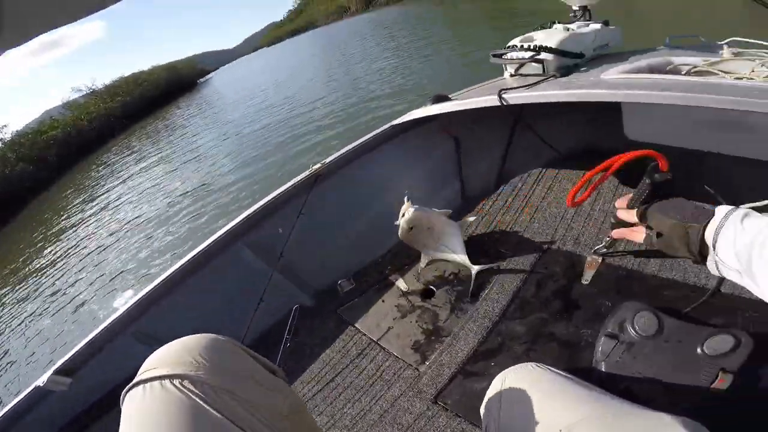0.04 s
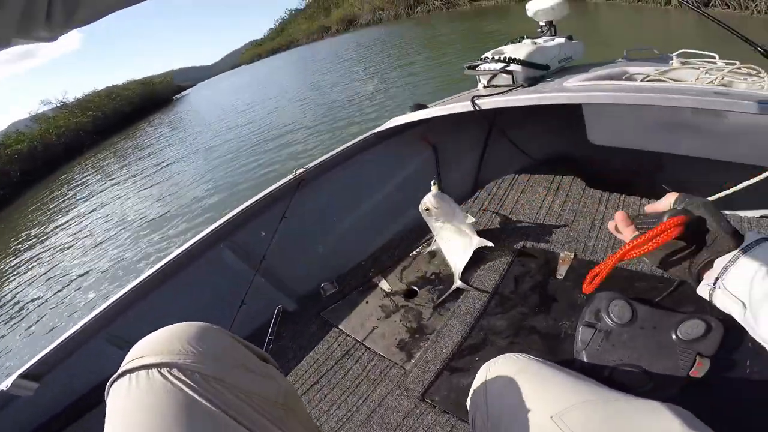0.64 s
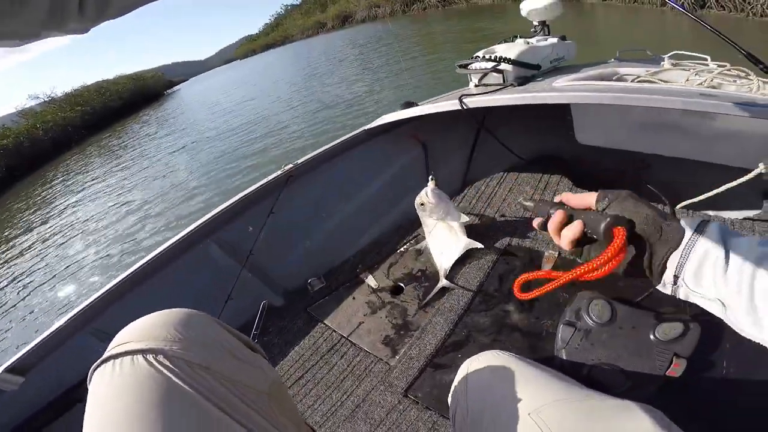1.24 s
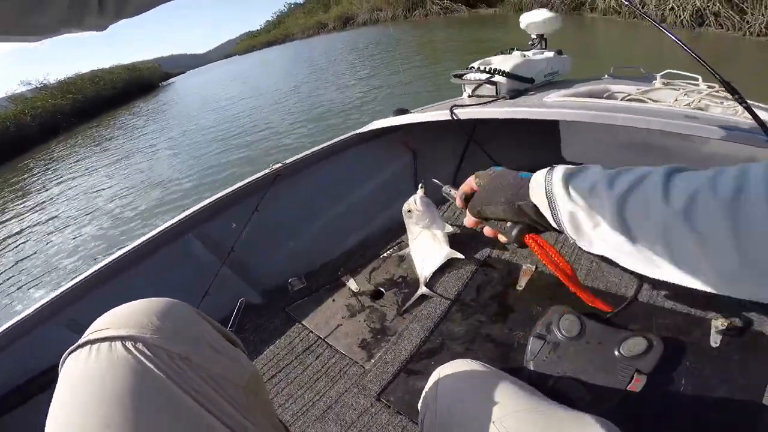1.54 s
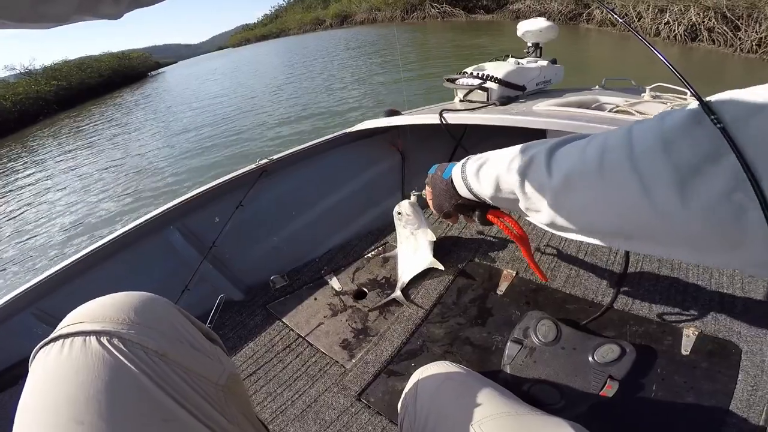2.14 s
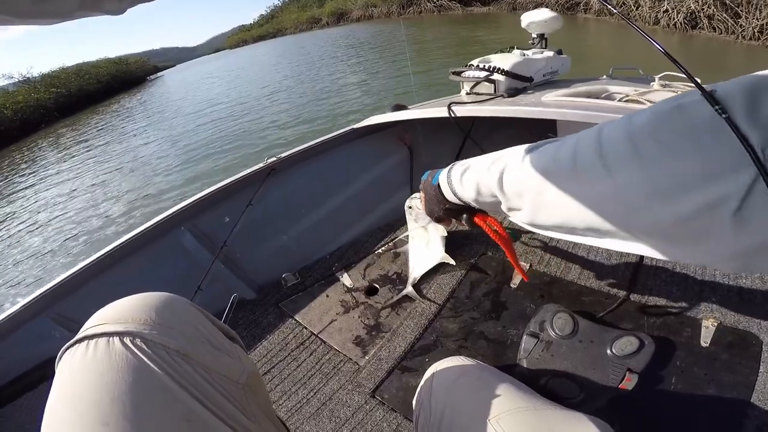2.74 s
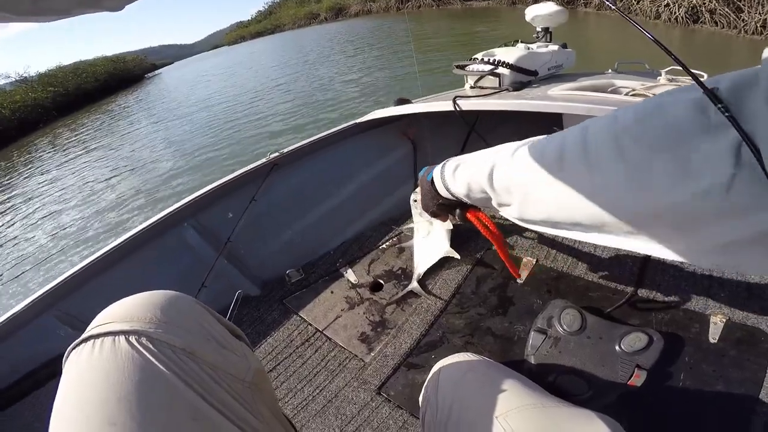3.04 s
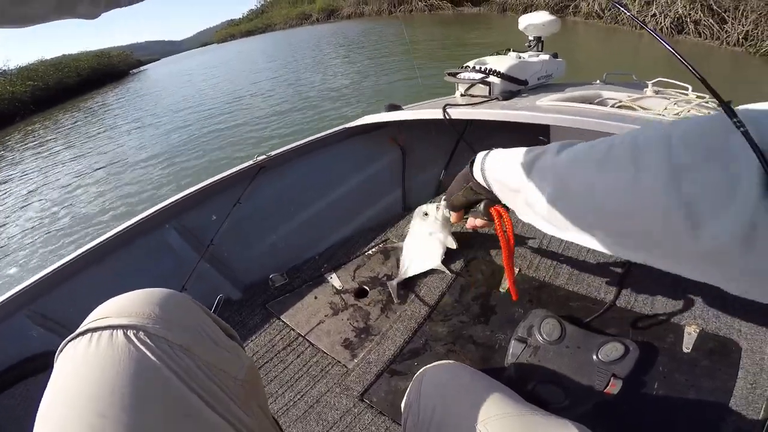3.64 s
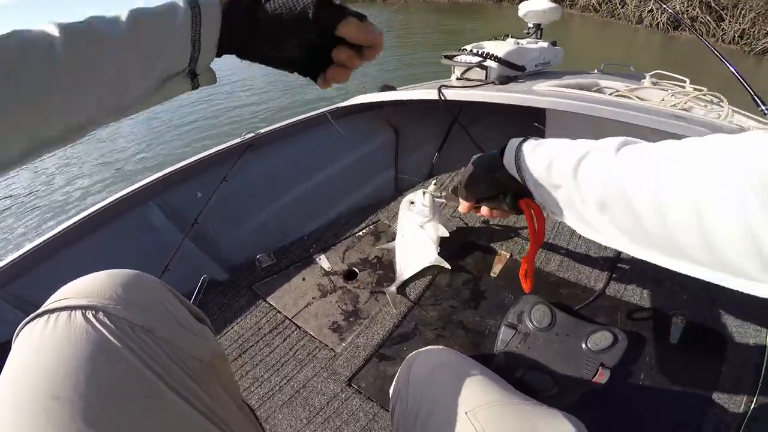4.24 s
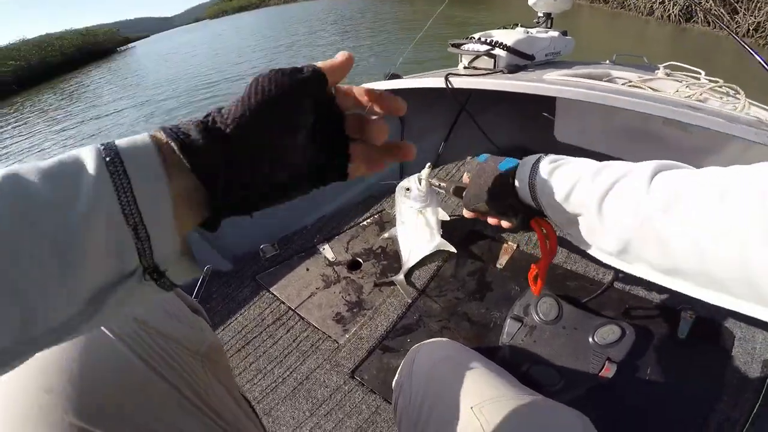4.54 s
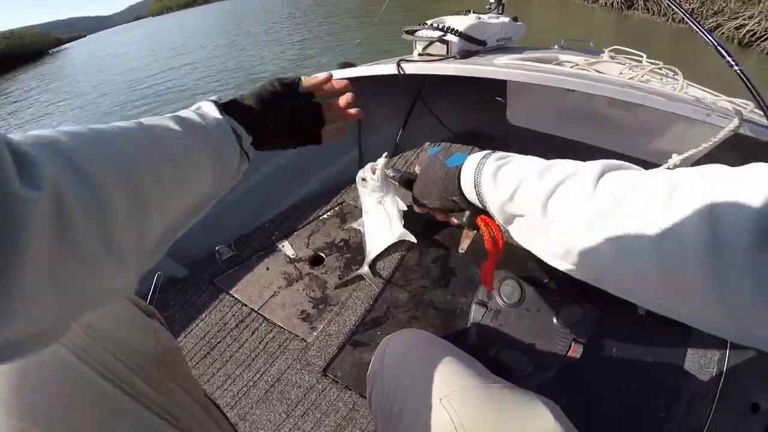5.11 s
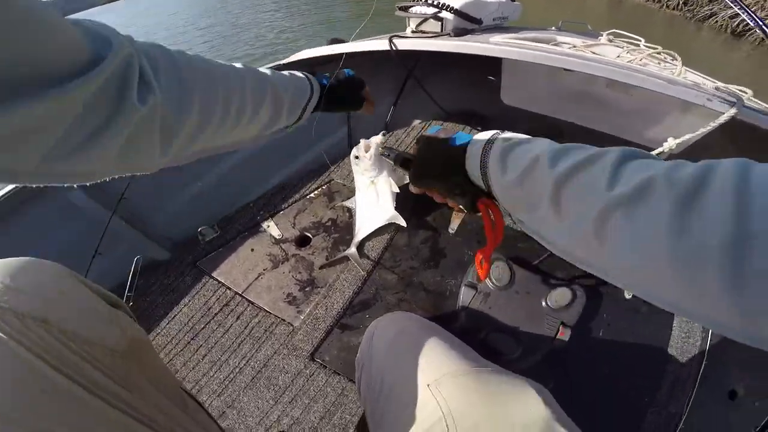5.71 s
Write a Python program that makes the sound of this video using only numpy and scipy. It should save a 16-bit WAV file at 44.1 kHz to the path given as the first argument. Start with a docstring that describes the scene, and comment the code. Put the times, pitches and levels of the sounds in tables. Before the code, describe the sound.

Steel pliers click on a hook, then a fish slaps the boat's carpeted floor in short fits, with dull thumps and soft water glugs.

```python
"""On the carpeted deck of an aluminium boat on a river, a small hooked fish flaps in rattling fits,
each a run of wet slaps that ring the deck panel. Steel pliers click, scrape and squeak on the hook.
Small waves trap air that glugs under the hull, over a faint wash of water and a rustle of sleeves.
The angler's movements thump and rumble through the deck into a body-worn microphone."""
import sys
import numpy as np
from scipy import signal
from scipy.fft import rfft, irfft
from scipy.io import wavfile
from scipy.ndimage import uniform_filter1d

SR = 44100
rng = np.random.default_rng(int(sys.argv[2]) if len(sys.argv) > 2 else 0)


def log_audio(samples):
    """Write samples as a 16-bit WAV file to the path given in sys.argv[1]."""
    # one column per channel
    frames = np.atleast_2d(samples).T
    # limit to full scale, then quantise
    limited = np.clip(frames, -1, 1)
    pcm = np.round(limited * 32767).astype(np.int16)
    wavfile.write(sys.argv[1], SR, pcm)


N = 254438
TIME = np.arange(N) / SR


def from_db(db):
    """Decibels to gain."""
    return 10 ** (np.asarray(db) / 20)


def rms_one(x):
    """Scale to unit rms."""
    return x / np.sqrt(np.mean(x ** 2) + 1e-20)


def in_time(rows):
    """Turn timed breakpoints into one fader curve per column."""
    s, *columns = np.transpose(rows)
    return [np.interp(TIME, s, column) for column in columns]


def add(out, s, sound):
    """Mix a short sound in at s seconds."""
    start = int(np.clip(round(s * SR), 0, N - 1))
    out[start:start + len(sound)] += sound[:N - start]


def drift(per_s):
    """A slow random wander between -2 and 2."""
    knots = np.arange(0, N / SR + 1, 1 / per_s)
    return np.interp(TIME, knots, rng.uniform(-2, 2, len(knots)))


def colour(x, spectrum):
    """Minimum-phase EQ with unit power gain, rolling off past the ends of the curve."""
    hz, db = np.transpose(spectrum)
    size = 2 ** int(np.ceil(np.log2(8 * SR / hz[0])))
    log_hz = np.log(np.maximum(np.fft.rfftfreq(size, 1 / SR), 1))
    outside = np.abs(log_hz - np.clip(log_hz, np.log(hz[0]), np.log(hz[-1])))
    gain = rms_one(from_db(np.interp(log_hz, np.log(hz), db) - 25 * outside))
    cepstrum = irfft(np.log(gain + 1e-9))[:size // 2]
    cepstrum[1:] *= 2
    impulse = irfft(np.exp(rfft(cepstrum, size)))
    return signal.oaconvolve(x, impulse)[:N]


def noise(spectrum):
    """Steady coloured noise at unit rms."""
    return rms_one(colour(rng.standard_normal(N), spectrum))


def even(x, window_s):
    """Ride out the slow swells of a noise."""
    power = uniform_filter1d(np.abs(signal.hilbert(x)) ** 2, int(window_s * SR))
    return rms_one(x / np.sqrt(np.maximum(power, 1e-6)))


def resonance(x, hz, width_hz):
    """Band-pass with unity gain at its peak."""
    return signal.lfilter(*signal.iirpeak(hz, hz / width_hz, fs=SR), x + 1e-18)


def band(x, hz, width_hz):
    """Two passes through one resonance, at unit rms."""
    return rms_one(resonance(resonance(x, hz, width_hz), hz, width_hz))


def grains(size, spread_db):
    """Gritty noise: every sample has its own random level."""
    return rng.standard_normal(size) * from_db(rng.normal(0, spread_db, size))


def swish(length_s, hz, width_hz):
    """A band of dense grains that swells quickly and tails off."""
    size = int(length_s * SR)
    swell = np.sin(np.pi * np.linspace(0, 1, size) ** .59)
    return swell * band(grains(size, spread_db=7.3), hz, width_hz)


def ring(modes, tilt_db_per_octave, detune):
    """One blow on a set of modes; strengths and pitches vary with the point of contact."""
    hz, db, t60 = np.transpose(modes)[:, :, None]
    t = TIME[:SR // 12]
    strength_db = db + tilt_db_per_octave * np.log2(hz / np.median(hz)) + rng.normal(0, 4, hz.shape)
    pitch = hz * (1 + detune * rng.standard_normal(hz.shape))
    return np.sum(from_db(strength_db - 60 * t / t60) * np.sin(2 * np.pi * pitch * t), axis=0)


def cracks(times, levels_db, rise_s, t60, tail_db, tail_t60):
    """Each contact is a quick noise burst with a weaker tail of scatter from the hull."""
    out, t = np.zeros(N), TIME[:SR // 8]
    envelope = from_db(-60 * t / t60) + from_db(tail_db - 60 * t / tail_t60)
    envelope *= 1 - np.exp(-t / rise_s)
    for s, db in zip(times, levels_db):
        add(out, s, from_db(db) * envelope * rng.standard_normal(len(t)))
    return out


# Fader moves for water and cloth. Each row: time in seconds, wash and rustle in dB before shaping.
BED_FADERS = [(0.0, -56, -63), (0.48, -64, -68), (0.98, -68, -70), (1.54, -63, -67), (1.98, -68, -69),
              (2.45, -65, -70), (2.75, -67, -70), (3.33, -62, -65), (3.78, -62, -68), (3.97, -56, -64),
              (4.15, -64, -69), (4.92, -67, -69), (5.4, -63, -67), (5.75, -63, -69)]
# The tone of the river, the sleeves and the hiss. Each row: frequency in Hz, relative level in dB.
WASH_EQ = [(120, -1), (300, 2), (450, -1), (650, -4.5), (1000, -10.5), (1800, -15.5), (3000, -29)]
RUSTLE_EQ = [(880, -32), (1500, -3), (2490, -4.5), (2700, -3.5), (3540, -3), (4940, -8), (8050, -10),
             (15500, -21)]
HISS_EQ = [(1000, -4.5), (2000, -6.5), (3000, -8), (4200, -7.5), (5200, -9), (6000, -5.5), (7000, -14),
           (10000, -15), (14500, -18.5), (15500, -24)]

def background():
    """The bed: faint river wash, grainy sleeve rustle, steady hiss and a thin, wavering whine."""
    wash_db, rustle_db = in_time(BED_FADERS)
    rustle_db += .7 * (rustle_db - np.median(rustle_db))   # cloth falls quiet between movements
    rustle = from_db(rustle_db - 2.2) * rms_one(colour(grains(N, spread_db=6.6), RUSTLE_EQ))
    whine = band(rng.standard_normal(N), hz=6000, width_hz=600)
    hiss = from_db(-69) * noise(HISS_EQ)
    whine *= from_db(-81 + 3 * drift(per_s=4))
    wash = from_db(wash_db + 1.6) * noise(WASH_EQ)
    return wash + rustle + hiss + whine


# How much the angler moves. Each row: time in seconds, relative sway level in dB.
BODY_MOVEMENT = [(0.0, -54), (0.88, -64), (1.73, -56), (2.07, -38), (2.47, -38), (2.99, -29), (3.25, -32),
                 (3.46, -39), (3.78, -38), (3.96, -29), (4.28, -36), (4.85, -39), (5.25, -32), (5.75, -34)]
# Tugs of the arm. Each row: start and length in seconds, sway level in dB, rubbing level in dB.
ARM_TUGS = [(1.25, .22, -52, -68), (1.88, .2, -38, -72), (2.14, .2, -32, -54), (2.52, .11, -20, -52),
            (2.76, .12, -24, -50), (2.91, .16, -27, -34.5), (3.77, .15, -29, -33), (3.89, .15, -24, -28),
            (4.07, .1, -19, -42), (5.01, .1, -30, -52), (5.16, .2, -26, -56), (5.48, .12, -25, -59)]
# The sub-bass sway and the muffled rubbing. Each row: frequency in Hz, relative level in dB.
SWAY_EQ = [(15, -4.5), (24, -0.5), (35, 0), (48, -3.5), (62, -11), (90, -24)]
RUBBING_EQ = [(40, -20.5), (65, 1.5), (100, -1), (150, -10), (220, -22.5), (400, -43.5)]

def handling():
    """The microphone sways in jolts with the body and clothing drags over it; each tug swells both."""
    movement_db, = in_time(BODY_MOVEMENT)
    swing_db = movement_db - movement_db.mean() + 2 * drift(per_s=11)
    sway = from_db(movement_db.mean() + 1.5 + swing_db)
    rubbing = from_db(-54.5 + .48 * swing_db)   # follows about half of the sway's swing
    for s, length, sway_db, rubbing_db in ARM_TUGS:
        swell = np.sin(np.linspace(0, np.pi, int(length * SR)))
        add(sway, s, from_db(sway_db) * swell)
        add(rubbing, s, from_db(rubbing_db) * swell)
    return sway * even(noise(SWAY_EQ), window_s=.091) + rubbing * even(noise(RUBBING_EQ), window_s=.052)


# Tool, fish and sleeve sliding. Each row: start and length in seconds, level in dB,
# centre and width in Hz.
SOFT_SCRAPES = [(0.019, 0.14, -58.5, 2800, 3200), (0.275, 0.035, -60, 2880, 900),
                (.583, 0.027, -61, 2400, 3500), (.63, .085, -65, 3500, 5000),
                (1.821, 0.088, -61.5, 1480, 3000), (2.895, 0.075, -52, 4550, 2000),
                (2.895, 0.057, -53, 1220, 420), (3.137, 0.059, -58, 4500, 5000),
                (3.487, 0.066, -49.5, 2050, 1900), (3.802, 0.054, -54, 2600, 3000),
                (3.84, 0.041, -46.5, 1060, 170), (3.973, 0.089, -55, 2200, 900),
                (3.987, 0.1, -55, 3800, 2600), (4.391, 0.07, -54.5, 3670, 3500),
                (5.3, .27, -65, 1100, 1100)]
# The jaws sliding along the hook. Each row: start and length in seconds, level in dB.
JAW_SLIDES = [(1.48, .085, -58), (1.559, .062, -47)]
# Resonances of the sliding jaws. Each row: centre and width in Hz, gain in dB.
JAW_PEAKS = [(2800, 1400, -4), (4720, 600, -.5), (7850, 7000, -2.5)]

def scrapes():
    """Friction: soft things slide with one resonance, the steel jaws with three."""
    out = np.zeros(N)
    for s, length, db, hz, width in SOFT_SCRAPES:
        add(out, s, from_db(db) * swish(length, hz, width))
    for s, length, db in JAW_SLIDES:
        for hz, width, peak_db in JAW_PEAKS:
            add(out, s, from_db(db + peak_db) * swish(length, hz, width))
    return out


# Air pockets under the hull. Each row: start in seconds, level in dB, starting pitch in Hz,
# seconds for the main note to fall 60 dB.
AIR_POCKETS = [(.145, -46, 339, .27), (.228, -50, 912, .16), (.655, -37, 385.4, .22),
               (.664, -48.5, 564, .08), (1.07, -42, 432.6, .18), (1.79, -55.5, 444, .2),
               (2.384, -43, 431, .15), (2.411, -37, 345, .21), (2.417, -44, 775, .16),
               (3.469, -33, 394, .08), (3.50, -36.5, 420, .13), (5.08, -55, 1116, .12),
               (5.655, -46, 465, .1), (5.692, -42, 315, .15)]
# Waves that lap without trapping air. Each row: start in seconds, level in dB.
WAVE_LAPS = [(.978, -59), (1.058, -60), (1.3, -60), (1.835, -61)]

def waves():
    """Waves splash the hull; trapped air glugs, rising a little, and the hull prolongs note and slosh."""
    out, t = np.zeros(N), TIME[:SR // 3]
    splash = dict(length_s=.045, hz=800, width_hz=1100)
    attack = 1 - np.exp(-t / .0017)
    for s, db, hz, t60 in AIR_POCKETS:
        note = np.sin(2 * np.pi * hz * t * (1 + .12 * t))
        slosh = resonance(rng.standard_normal(len(t)), hz, width_hz=150)
        slosh = rms_one(resonance(slosh, hz, width_hz=320))
        fade = from_db(-60 * t / t60)
        hull_tail = .16 * fade ** .4 * note + .22 * fade ** .55 * slosh
        add(out, s, from_db(db) * attack * (fade * note + hull_tail))
        add(out, s, from_db(db - 20) * swish(**splash))
    for s, db in WAVE_LAPS:
        add(out, s, from_db(db) * swish(**splash))
    return signal.sosfilt(signal.butter(2, 1400, fs=SR, output="sos"), out)


# Sharp clicks of the pliers. Each row: start in seconds, relative level and brightness in dB.
PLIER_CLICKS = [(0.148, -55, -4), (1.4745, -49, -12), (1.4997, -49.5, -13), (1.5217, -38.5, -1),
                (1.5532, -38, -1), (1.6262, -48.5, -14.5), (1.6759, -38, -11), (1.7029, -38, -8.5),
                (1.8845, -57, -4), (2.9917, -46, -12), (3.129, -40.5, -13), (3.173, -46, 4),
                (3.2092, -52.0, 1.0), (3.3702, -51, 1)]
# Modes of the steel jaws. Each row: pitch in Hz, relative level in dB, seconds to fall 60 dB.
JAW_MODES = [(1240, -7, 0.029), (2370, -5.5, 0.02), (2650, -1, 0.036), (3521, -8, 0.042), (4040, -1, .025),
             (5160, -2.5, 0.023), (6270, 0, 0.027), (6700, -3, 0.031), (8720, -2, 0.039),
             (9600, -7.5, 0.033), (10500, -8, 0.029), (11600, -22, .03), (14400, -12, .03)]

def pliers():
    """Steel jaws snap on the hook with a crack and a ring; the grip shifts their modes each time."""
    s, level_db, bright_db = np.transpose(PLIER_CLICKS)
    tilts = .5 * (bright_db - bright_db.mean())
    steel = np.zeros(N)
    for at, db, tilt in zip(s, level_db, tilts):
        add(steel, at, from_db(db) * ring(JAW_MODES, tilt, detune=.031))
    low_cut = signal.butter(2, 1100, "high", fs=SR, output="sos")   # a small tool radiates no bass
    crack = cracks(s, level_db, rise_s=.0002, t60=.022, tail_db=-16, tail_t60=.11)
    crack_eq = [(1100, -2.5), (2600, 4.5), (6500, 0), (10000, -9), (15000, -14)]
    return from_db(-4) * signal.sosfilt(low_cut, steel) + from_db(-.5) * colour(crack, crack_eq)


# Modes of the deck panel. Each row: pitch in Hz, relative level in dB, seconds to fall 60 dB.
DECK_MODES = [(216, -6, 0.082), (275, -0.5, .055), (380, -4, 0.045), (488, -1.5, 0.056), (593, -6.5, .035),
              (808, -11, 0.074), (1080, -17, .02)]

def deck(times, levels_db):
    """Every blow rings the damped deck panel."""
    out = np.zeros(N)
    for s, db in zip(times, levels_db):
        add(out, s, from_db(db) * ring(DECK_MODES, tilt_db_per_octave=-2, detune=.022))
    return out


# Fits of flapping. Each row: start and length in seconds, relative slap and body levels in dB,
# ping pitch in Hz, relative ping level in dB.
FLAP_FITS = [(2.1894, .049, -38.5, -33, 5700, -5), (4.0602, .061, -34, -29, 4050, -1),
             (4.43, .038, -34, -34, 3750, 2.5), (5.175, .036, -35.5, -30, 3250, -1)]
# Single flicks of the tail. Each row: start in seconds, relative level in dB.
TAIL_FLICKS = [(4.0385, -41), (4.0966, -36.5), (4.409, -46.5), (4.4185, -42.5), (5.1576, -34)]
# The tone of wet skin. Each row: frequency in Hz, relative level in dB.
SLAP_EQ = [(400, 3.5), (700, 0), (1000, -4), (1450, -1), (2100, -6), (2900, -3), (4000, -1.5), (4700, -9),
           (6000, -6), (7300, -11), (8500, -20), (15000, -28)]
# Hollow resonances in every slap. Each row: centre and width in Hz, relative gain in dB.
HOLLOW_PEAKS = [(1390, 140, 3), (2710, 130, -1), (3020, 100, -3), (5330, 350, -0.5)]

def flaps():
    """The fish hits the deck in quick wet slaps that blur into a rasp over the note of the panel."""
    gap_s, jitter_s = .0083, .0008
    contacts = [(s, db, db - 5, 3800, -4) for s, db in TAIL_FLICKS]
    for start, length, slap_db, body_db, hz, ping_db in FLAP_FITS:
        for along in np.linspace(0, 1, round(length / gap_s) + 1):
            stray, uneven = rng.standard_normal(2) * (along > 0)
            at = start + along * length + jitter_s * stray
            tiring_db = slap_db - 14 * along ** 1.35 + 2 * uneven   # weakens, slowly at first
            landing_db = body_db - 4.5 * (2 * along - 1) ** 2   # heaviest in mid-fit
            sagging_hz = hz * (1 - .17 * along)   # the contact moves along the fish
            contacts.append((at, tiring_db, landing_db, sagging_hz, ping_db))
    s, slap_db, body_db, ping_hz, pings_db = np.transpose(contacts)
    slap = colour(cracks(s, slap_db, rise_s=.00025, t60=.019, tail_db=-14.5, tail_t60=.092), SLAP_EQ)
    hollow = sum(from_db(db) * resonance(slap, hz, width) for hz, width, db in HOLLOW_PEAKS)
    skin, t = np.zeros(N), TIME[:SR // 25]
    squeezed_air = from_db(5) * np.exp(-t / .00073) * np.sin(2 * np.pi * 1150 * t)
    ping_hz *= 1 + .04 * rng.standard_normal(len(s))
    for at, db, hz, ping_db in zip(s, slap_db, ping_hz, pings_db):
        ping = from_db(ping_db + 4) * np.exp(-t / .0035) * np.sin(2 * np.pi * hz * t)
        add(skin, at, from_db(db) * (ping + squeezed_air))
    for at, length, _, db, _, _ in FLAP_FITS:   # skin drags on the carpet
        add(skin, at, from_db(db - 18) * swish(length, hz=950, width_hz=900))
    return from_db(1.8) * slap + from_db(2.5) * hollow + skin + from_db(-.6) * deck(s, body_db)


# Soft thumps through the deck. Each row: start in seconds, level in dB, pitch in Hz.
DECK_THUMPS = [(2.258, -16, 60), (2.529, -5.5, 72.3), (2.777, -1, 150), (2.79, -4.5, 68.5),
               (2.905, -13, 110), (3.02, -10, 48), (3.034, -19, 148), (3.422, -12, 35), (3.782, -15, 96),
               (3.819, -11, 88.3), (3.91, -8, 96.7), (3.931, -6, 88), (4.095, -12, 88), (4.111, -1, 46),
               (4.725, -19.5, 75), (4.845, -18.5, 70.4), (5.192, -7, 62.8), (5.335, -13.5, 52),
               (5.574, -21, 95)]

def thumps():
    """Soft blows with a round attack and a few low cycles; the hull booms on near its own pitch."""
    out, t = np.zeros(N), TIME[:SR // 3]
    decay_cycles = 4.5
    for s, db, hz in DECK_THUMPS:
        attack = 1 - np.exp(-(t * hz / .29) ** 2)
        fade = from_db(-60 * t * hz / decay_cycles)
        add(out, s, from_db(db) * attack * fade * np.sin(2 * np.pi * hz * t))
    return out + resonance(out, hz=94, width_hz=14)


# Dull knocks against the fish. Each row: start in seconds, relative crunch and deck levels in dB.
HOOK_KNOCKS = [(2.899, -48.5, -58), (3.25, -43, -54), (3.272, -48.5, -56), (3.5054, -36.5, -41),
               (3.804, -46, -43), (3.907, -42, -42), (3.916, -36.5, -33), (3.925, -52, -34)]
# The two hits in each knock. Each row: delay in seconds, crunch and deck offsets in dB.
BLOW_AND_REBOUND = [(0, 0, 0), (.007, -9, 0)]
# The tone of the crunch. Each row: frequency in Hz, relative level in dB.
CRUNCH_EQ = [(700, -8.5), (1000, -4.5), (1500, -2.5), (2300, -1.5), (2800, -6), (3500, -0.5), (4800, -8.5),
             (7000, -11), (10000, -18), (15000, -23)]

def knocks():
    """Hook and tool crunch against the fish and jolt the deck."""
    hits = [np.add(knock, hit) for knock in HOOK_KNOCKS for hit in BLOW_AND_REBOUND]
    s, crunch_db, deck_db = np.transpose(hits)
    crunch = cracks(s, crunch_db, rise_s=.00052, t60=.032, tail_db=-18, tail_t60=.076)
    return from_db(5) * colour(crunch, CRUNCH_EQ) + from_db(-.5) * deck(s, deck_db)


# Overtones of the squeak. Each row: harmonic number, relative level in dB.
SQUEAK_HARMONICS = [(2, -1), (3, -10), (4, 0), (5, -14.5), (6, -14)]

def squeak():
    """Steel sticks and slips on steel in one brief, rough whistle as the grip chatters."""
    peak_s, length_s, fundamental_hz = 3.329, .02, 2377.5
    t = TIME[:SR // 8] - 1 / 16
    jitter = rms_one(uniform_filter1d(rng.standard_normal(len(t)), size=14))
    phase = 2 * np.pi * np.cumsum(fundamental_hz * (1 + .03 * jitter)) / SR
    tone = sum(from_db(db) * np.sin(k * phase) for k, db in SQUEAK_HARMONICS)
    chatter_db = 3 * rms_one(uniform_filter1d(rng.standard_normal(len(t)), size=24))
    swell = rms_one(from_db(chatter_db)) * np.exp(-(2 * t / length_s) ** 2)
    grit = .28 * rng.standard_normal(len(t))
    out = np.zeros(N)
    add(out, peak_s + t[0], from_db(-31.7) * swell * (tone + grit))
    return out


def scene():
    """All sources mixed in mono at the body-worn microphone."""
    fish_and_tool = flaps() + pliers() + knocks() + scrapes() + squeak()
    return (fish_and_tool + waves() + thumps() + handling() + background())[None]


def record(dry):
    """A steep high cut at 15.4 kHz."""
    return signal.sosfilt(signal.ellip(10, .2, 80, 15400, fs=SR, output="sos"), dry)


dry = scene()
out = record(dry)
log_audio(out)
```